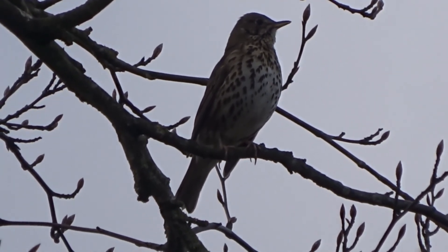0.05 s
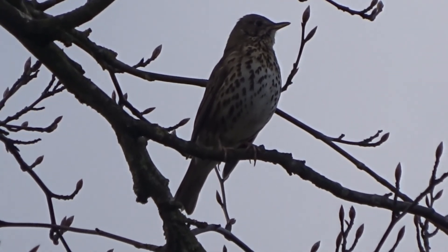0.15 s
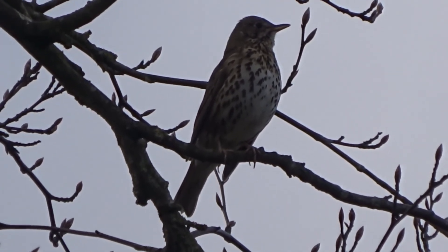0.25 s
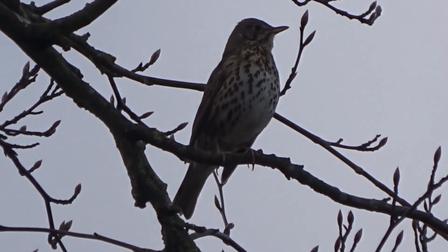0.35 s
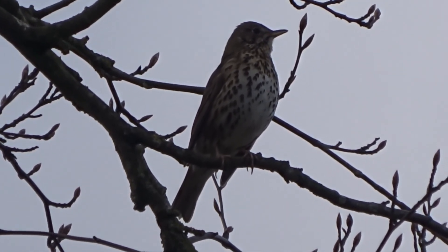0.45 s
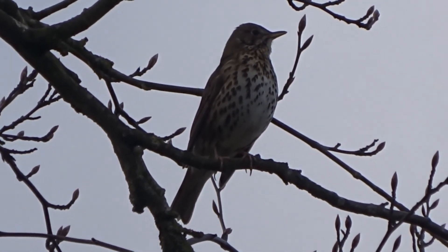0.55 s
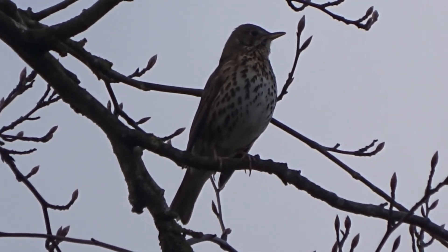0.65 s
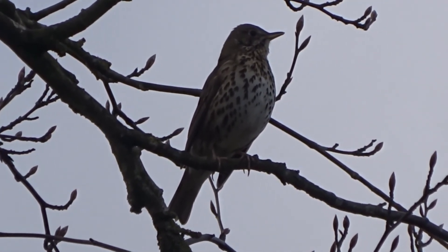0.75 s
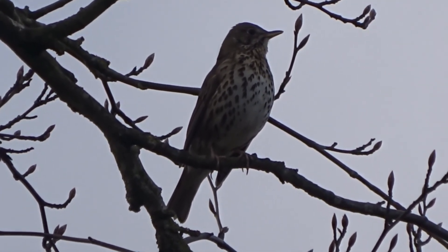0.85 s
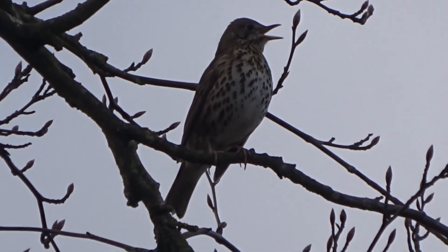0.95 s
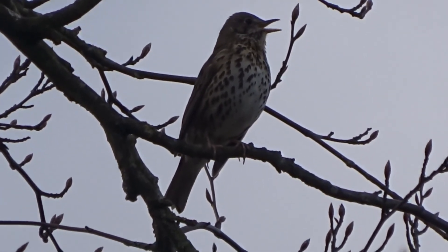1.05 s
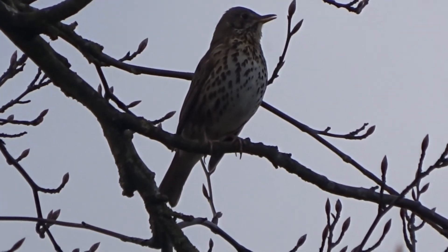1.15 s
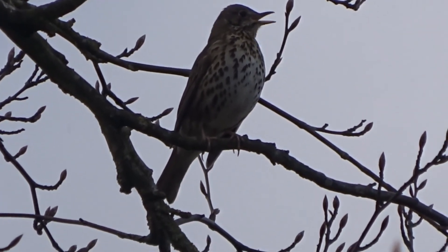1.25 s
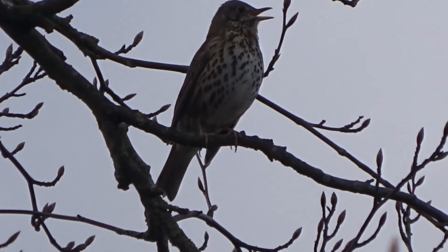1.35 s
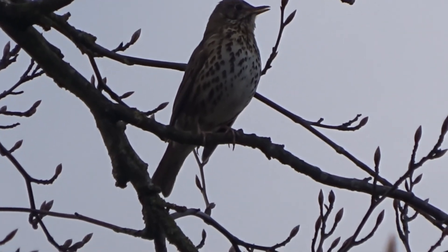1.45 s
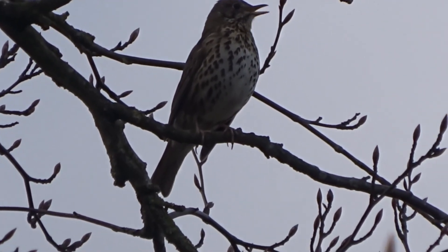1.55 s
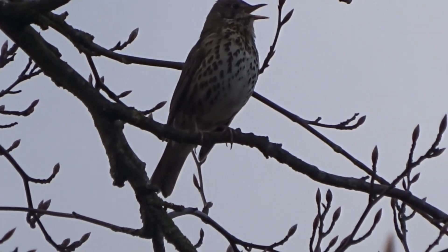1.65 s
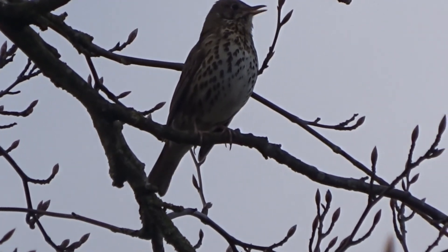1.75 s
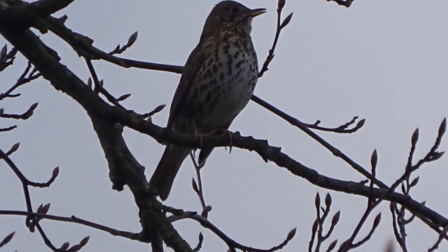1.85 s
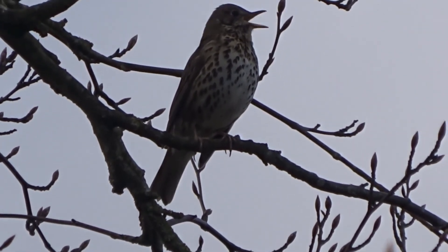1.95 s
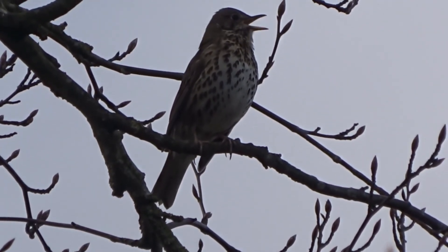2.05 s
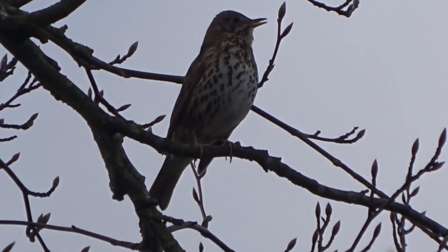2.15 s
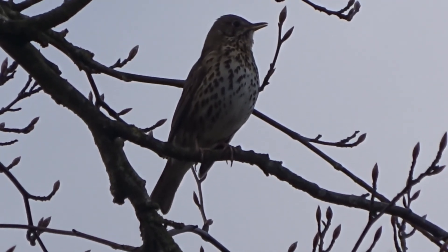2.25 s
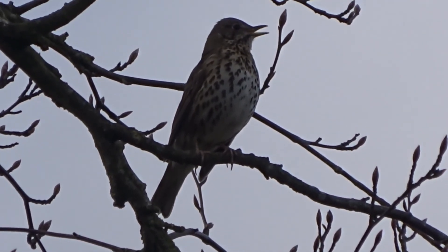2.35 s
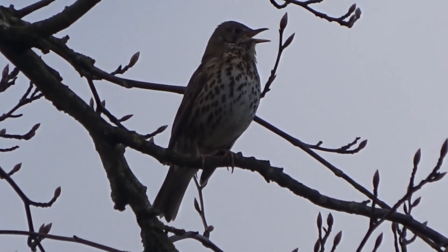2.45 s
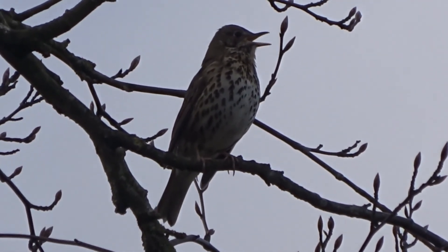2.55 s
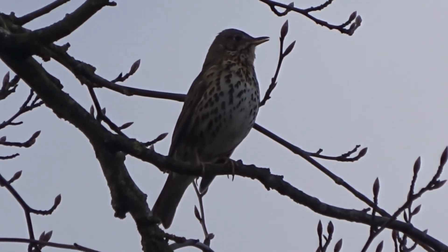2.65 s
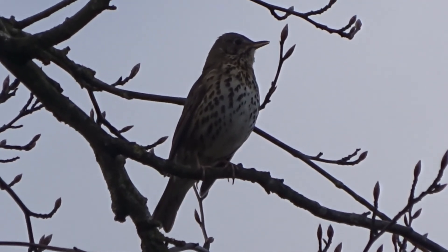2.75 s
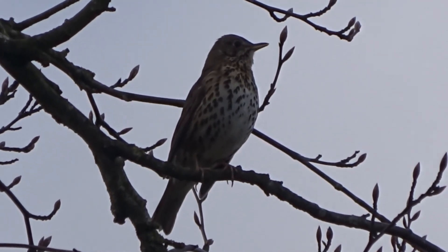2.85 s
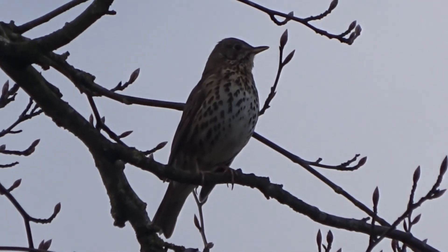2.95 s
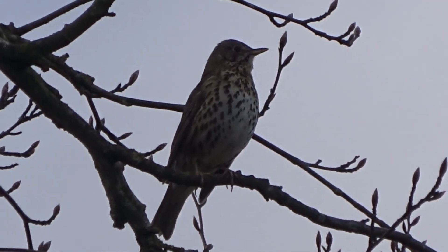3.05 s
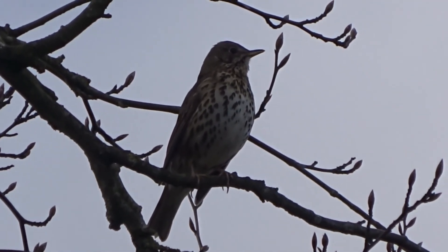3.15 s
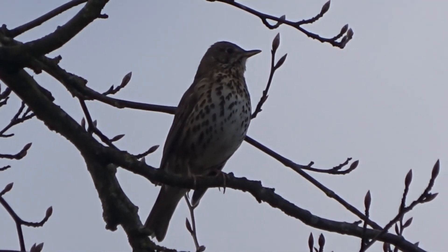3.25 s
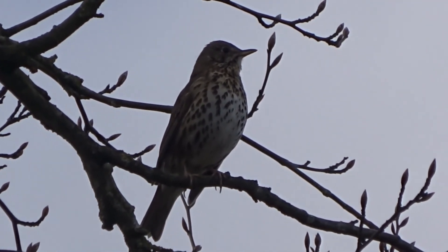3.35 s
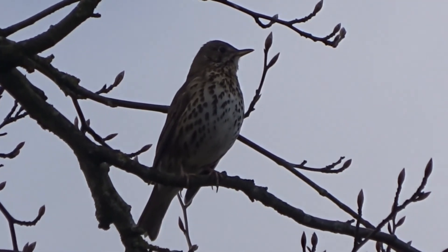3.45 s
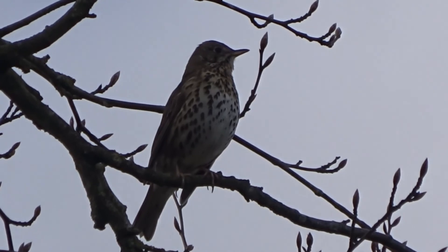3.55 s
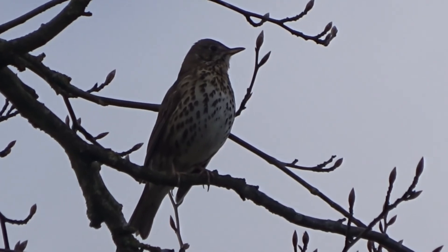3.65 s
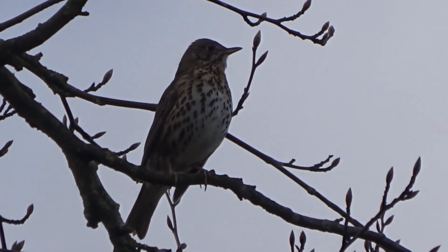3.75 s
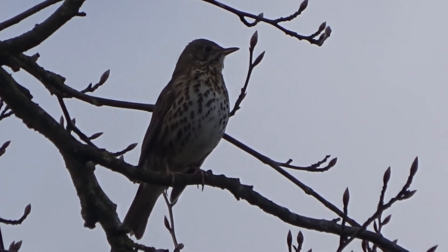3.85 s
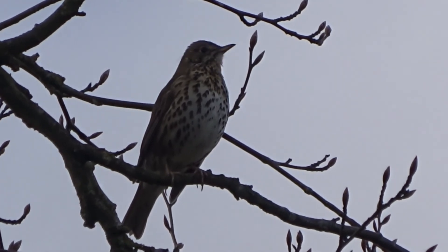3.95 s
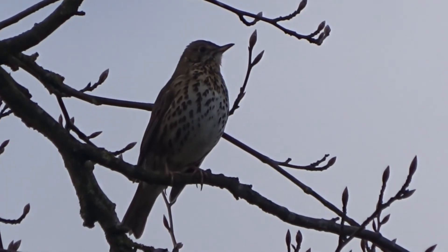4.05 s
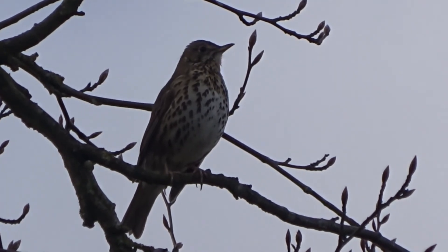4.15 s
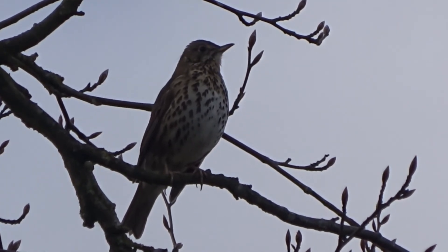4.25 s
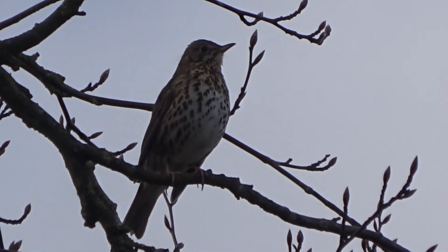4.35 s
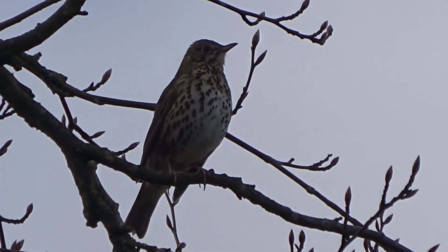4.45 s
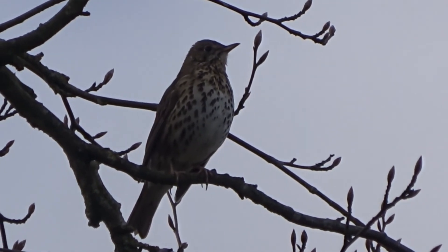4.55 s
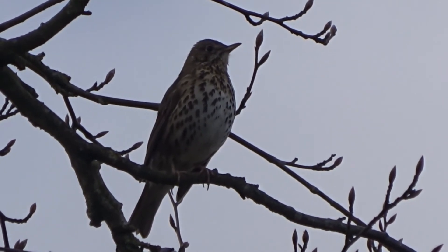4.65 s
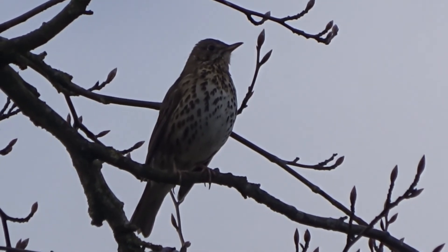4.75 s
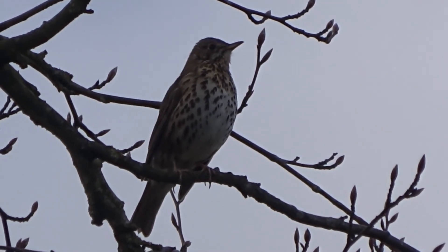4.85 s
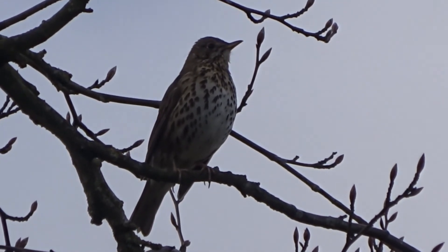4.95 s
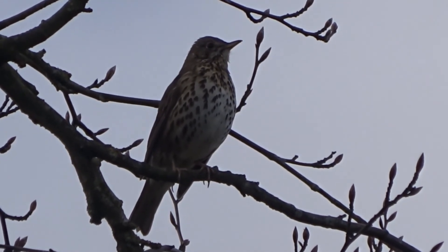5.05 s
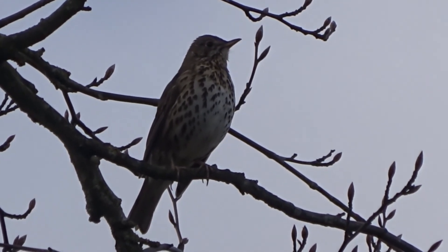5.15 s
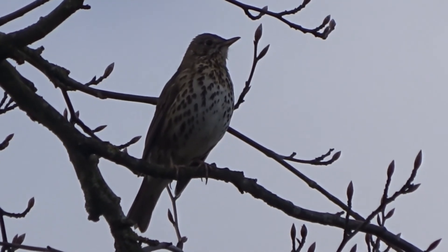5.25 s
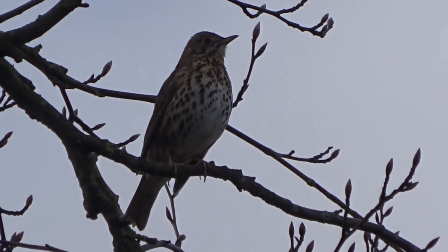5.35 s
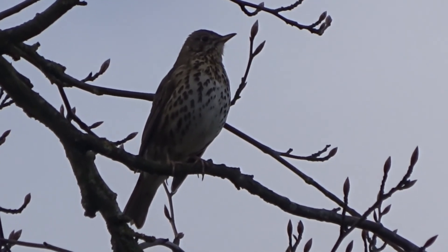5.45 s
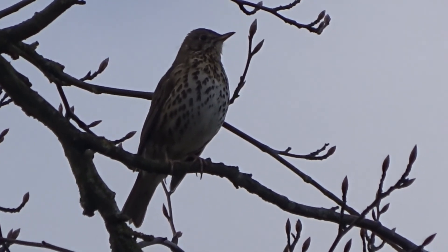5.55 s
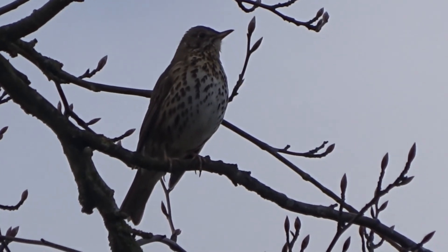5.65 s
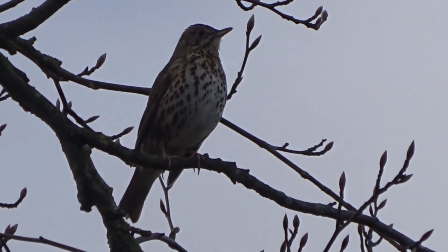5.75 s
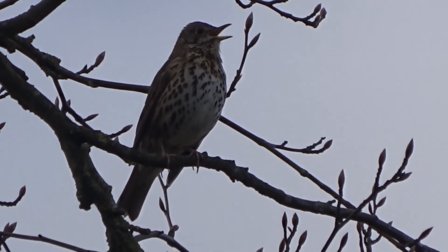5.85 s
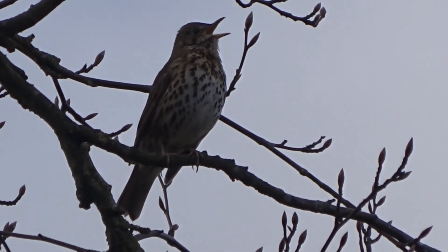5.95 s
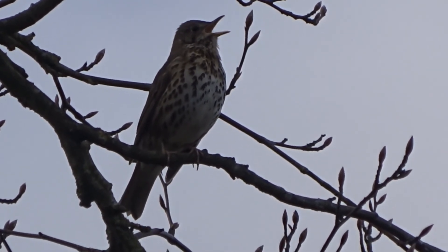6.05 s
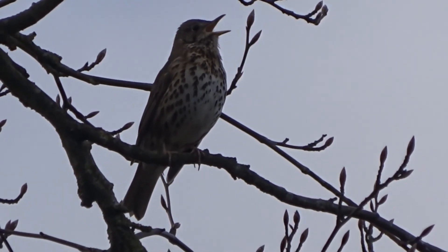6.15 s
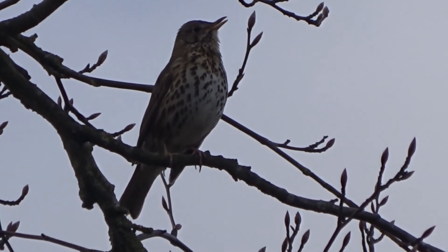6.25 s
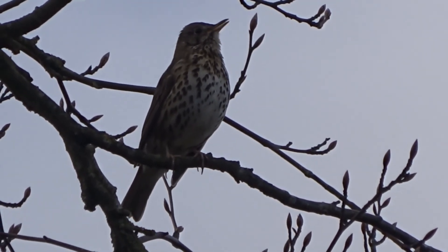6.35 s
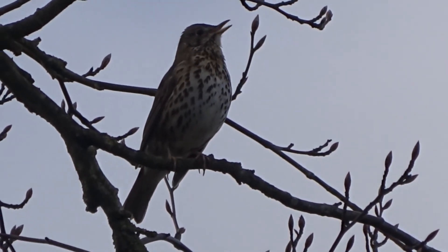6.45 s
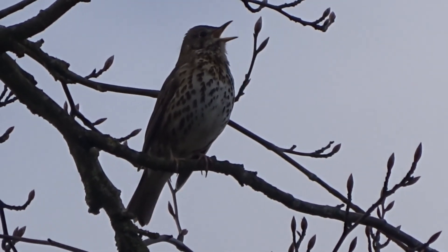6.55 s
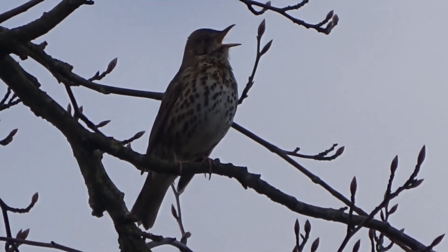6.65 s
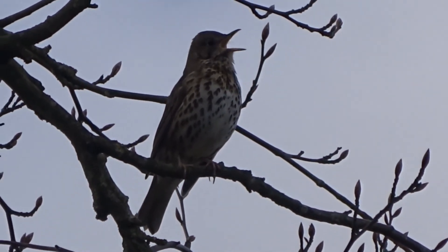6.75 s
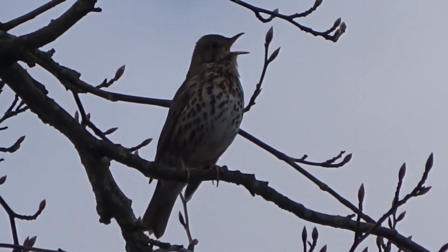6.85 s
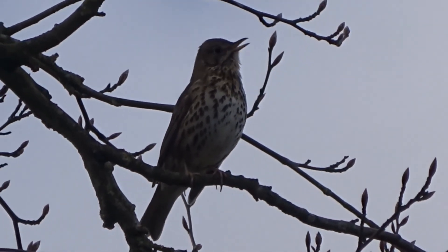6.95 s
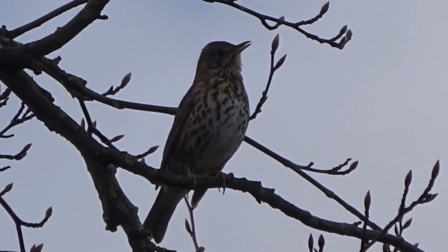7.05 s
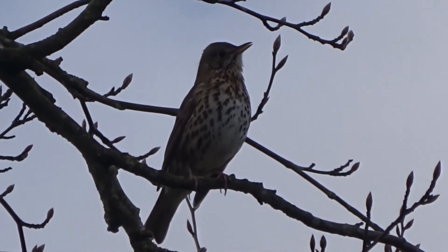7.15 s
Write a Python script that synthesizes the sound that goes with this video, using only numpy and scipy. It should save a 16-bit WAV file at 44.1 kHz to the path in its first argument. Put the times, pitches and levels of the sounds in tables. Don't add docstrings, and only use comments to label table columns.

```python
import sys
import numpy as np
from scipy import signal
from scipy.fft import rfft, irfft
from scipy.io import wavfile
from scipy.ndimage import uniform_filter1d, minimum_filter1d

SR = 44100
rng = np.random.default_rng(int(sys.argv[2]) if len(sys.argv) > 2 else 0)


def ratio_of_db(decibels):
    return 10 ** (np.asarray(decibels, float) / 20)


def int16_out(signal):
    q = np.round(np.clip(np.atleast_2d(signal).T, -1, 1) * 32767)
    wavfile.write(sys.argv[1], SR, q.astype(np.int16))


N = 317520

# t/s, level/dB
MOTIFS = [(2.045, -36), (2.273, -37.5), (2.53, -37), (5.67, -37.5), (5.905, -36.5), (6.15, -39.5)]
# t/s, length/s, pitch factor, level/dB
SLURS = [
    (1.068, .085, 1.001, 1),
    (1.392, .077, .999, -2),
]
# t/s, length/s, throb period/s, level/dB
DROPS = [
    (1.7031, 0.11, 0.05, 1.15),
    (2.0419, 0.15, 0.066, -0.3),
    (2.496, 0.1738, .053, -0.86),
]
GRACE_S = .03


def span(s, length):
    start = int(s * SR)
    at = np.arange(start, min(start + int(length * SR), N))
    return at, (at - start) / (length * SR)


def phase(hz):
    return 2 * np.pi * np.cumsum(hz) / SR


def walk(rate):
    k = int(SR / rate)
    steps = np.repeat(rng.standard_normal(N // k + 1), k)
    return 1.9 * uniform_filter1d(uniform_filter1d(steps, k), k)[:N]


def band(x, lo_hz, hi_hz):
    return signal.sosfilt(signal.butter(2, [lo_hz, hi_hz], "band", fs=SR, output="sos"), x)


def on_log(table, hz):
    table_hz, db = np.transpose(table)
    return np.interp(np.log(hz + 1), np.log(table_hz), db)


def pan(x, left_minus_right_db):
    half_db = np.asarray(left_minus_right_db) / 2
    return np.array([x * ratio_of_db(half_db), x * ratio_of_db(-half_db)])


def trees(x, db, t60, gap, sparse_db):
    t = np.arange(SR) / SR
    uneven = ratio_of_db(sparse_db * np.minimum(rng.standard_exponential(SR), 4))
    shape = ratio_of_db(-60 * t / t60) * np.clip(t / gap, 0, 1) * uneven
    mid, side = shape * rng.standard_normal((2, SR))
    response = np.array([mid + 0.36 * side, mid - 0.17 * side]) / np.sqrt(np.sum(mid ** 2))
    return ratio_of_db(db) * signal.fftconvolve(np.atleast_2d(x), response, axes=1)[:, :N]


def warble(rows, rate_hz, swing_hz, settle, throb, octave_db, reach, bend, ragged):
    out, stray = np.zeros(N), walk(200)
    for s, length, start_hz, end_hz, db in rows:
        at, u = span(s, length)
        shake = np.sin(phase(rate_hz * (1 + .3 * u + ragged * stray[at])))
        glide_hz = start_hz + (end_hz - start_hz) * np.minimum(u / reach, 1) ** bend
        stray_hz = 35 * stray[at] - 120 * u ** 3
        angle = phase(glide_hz + stray_hz + swing_hz * (1 - settle * u) * shake)
        edges = np.clip(np.minimum(7 * u, 6 * (1 - u)), 0, 1)
        swell = (0.068 + 1.71 * u) * edges * (1 + throb * u * shake)
        over = (1 + 0.49 * shake) ** 2 * (np.sin(2 * angle) + ratio_of_db(-17.0) * np.sin(3 * angle))
        out[at] += ratio_of_db(db) * swell * (np.sin(angle) + ratio_of_db(octave_db) * over)
    return out


def chirps(calls):
    out, flutter = np.zeros(N), ratio_of_db(1.7 * walk(120))
    for s, length, start_hz, end_hz, db in calls:
        mid_hz = start_hz + .63 * (end_hz - start_hz)
        at, u = span(s - .002, length + .004)
        v = (2 * u - 1) * (1 + .004 / length)
        hz = mid_hz + (end_hz - start_hz) / 2 * v + ((start_hz + end_hz) / 2 - mid_hz) * v ** 2
        out[at] += ratio_of_db(db + 6) * np.sin(np.pi * u ** 1.15) * np.sin(phase(hz))
    return out * flutter + ratio_of_db(-12) * np.roll(out, int(.009 * SR)) * flutter[::-1]


def hush():
    # f/Hz, level/dB per Hz
    colour = [(59, -90), (100, -68), (166, -47.5), (502, -25.5), (768, -7), (1030, 1), (1550, -2),
              (2470, -10.5), (3120, -8), (4290, -12), (4670, -16), (8640, -23.5), (12900, -23),
              (14700, -27.5), (16000, -23.5)]
    # f/Hz, side minus mid/dB
    width = [(300, -19.5), (1000, -12), (3000, -3.5), (6500, -4), (9000, -13.5), (15000, -11)]
    hz = np.fft.rfftfreq(N, 1 / SR)
    mid, side = (irfft(rfft(rng.standard_normal(N)) * ratio_of_db(on_log(colour, hz) + db), N)
                 for db in (0, on_log(width, hz)))
    level_db = -47 + .35 * walk(1.5)
    gain = ratio_of_db(level_db) / np.std(band(mid, 500, 2200))
    whine = ratio_of_db(-60.5) * np.sin(phase(np.full(N, 15625)))
    return gain * np.array([ratio_of_db(.5) * (mid + side), ratio_of_db(-1.0) * (mid - side)]) + pan(whine, 6)


def crack():
    out = np.zeros(N)
    at, u = span(2.502, 0.032)
    out[at] = ratio_of_db(-14) * np.exp(-u / 0.22) * rng.standard_normal(len(at))
    out = band(band(out, 910, 5540), 790, 6800)
    return pan(out, 6) + trees(out, db=0.0, t60=0.69, gap=0.0063, sparse_db=-0.5)


def rattles():
    # t/s, length/s, rate/clicks per s, level/dB, bird 0 or 1
    bursts = [
        (0, .022, 69.5, -49, 0),
        (0.025, 0.074, 69.5, -41, 0),
        (0.141, 0.097, 69.5, -40.5, 0),
        (0.285, 0.12, 69.5, -40.5, 0),
        (2.922, 0.064, 75, -42, 1),
        (3.071, 0.062, 75, -41.5, 1),
        (3.203, 0.069, 71, -42, 1),
    ]
    # f/Hz, width/Hz, level/dB
    throats = [
        [(4300, 1300, -8), (5400, 370, -4.5), (6330, 470, -7.5)],
        [(4600, 690, -10.5), (6000, 760, -9), (6810, 380, -11)],
    ]
    rise_share = (.2, .1)
    ticks, ring, wander = np.zeros((2, N)), np.zeros(N), walk(140)
    for s, length, rate, db, bird in bursts:
        bird = round(bird)
        at, u = span(s, length)
        late = (u * length * rate % 1) / rise_share[bird]
        puff = ratio_of_db(db) * (0.27 + u ** 0.58) * late * np.exp(1 - late)
        ticks[bird, at] += puff * rng.standard_normal(len(at))
        if bird == 0:
            ring[at] += puff * np.sin(phase(5400 - 150 * (late - 1) + 110 * wander[at]))
    throat = sum(ratio_of_db(db) * band(x, hz - width / 2, hz + width / 2)
                 for x, modes in zip(ticks, throats) for hz, width, db in modes)
    return ratio_of_db(7) * ring + ratio_of_db(21.0) * throat


def trills():
    # length/s, start f/Hz, end f/Hz, level/dB
    trill = (0.0734, 7548, 5747.5, -1.4)
    length, start_hz, end_hz, trill_db = trill
    rows = [(s, length, start_hz, end_hz, db + trill_db) for s, db in MOTIFS]
    return warble(rows, rate_hz=175, swing_hz=520, settle=.8, throb=.4,
                  octave_db=-50, reach=1, bend=1.0, ragged=.1)


def place(starts, shape):
    return [(s + late, length, a_hz, b_hz, db + part_db)
            for s, db in starts for late, length, a_hz, b_hz, part_db in shape]


def zigzag():
    # t/s, level/dB
    turns = [(4.495, -50), (4.55, -40.5), (4.603, -38.5), (4.665, -39), (4.732, -38.5), (4.845, -49),
             (4.878, -53)]
    # t after its start/s, length/s, start f/Hz, end f/Hz, level/dB
    turn = [
        (.002, 0.0148, 4256, 3280, 1.5),
        (.024, 0.018, 3120, 3700, -4.5),
        (.038, 0.0177, 3700, 4300, -5),
    ]
    return chirps(place(turns, turn))


def twitter():
    calls = []
    for s, pitch, up in rng.random(size=(120, 3)):
        hz = 3000 + pitch * 1500
        calls.append((s * N / SR, .016, hz, hz + 700 * (2 * up - 1), -58))
    return calls


def far_calls():
    # t/s, length/s, start f/Hz, level/dB
    sweeps = [(.169, .019, 3040, -37.5), (.273, .018, 3050, -39), (.527, 0.045, 3400, -53.5),
              (1.124, 0.015, 3480, -40), (1.709, 0.017, 4150, -48), (1.976, .008, 4240, -46),
              (2.063, .018, 4200, -43), (2.219, 0.019, 3304, -41), (2.687, .014, 4007, -44.5),
              (3.045, 0.0187, 3090, -41), (3.419, 0.023, 3430, -43.5), (3.766, 0.0083, 3150, -39.5),
              (3.874, .006, 3520, -39), (3.99, .009, 3420, -42), (4.535, 0.015, 3310, -39.5),
              (4.7, .017, 3220, -38.5), (4.987, .01, 3490, -46), (5.326, 0.016, 3800, -38.5),
              (5.615, 0.014, 3210, -36), (5.774, .01, 4120, -35), (6.543, .016, 3520, -40),
              (6.799, 0.013, 3640, -42.5), (7.152, 0.027, 3520, -40.5)]
    lifts = [(.614, 0.016, 3990, -53), (.731, 0.019, 3750, -46), (.884, 0.013, 3730, -57),
             (3.343, .018, 3820, -42), (3.247, 0.015, 3230, -40.5), (3.697, 0.013, 3620, -45),
             (3.827, .012, 3870, -43), (3.939, 0.013, 3900, -43), (6.946, 0.0072, 4100, -44)]
    rises = [(.667, .017, 3400, -47.5), (.809, 0.011, 3570, -43), (1.22, 0.0074, 3640, -39),
             (1.611, 0.031, 3100, -40), (2.704, 0.012, 3810, -41.5), (3.461, 0.023, 3450, -44),
             (3.72, 0.0087, 3620, -42), (4.785, 0.03, 3380, -40.5), (4.76, .012, 3770, -41),
             (4.83, .015, 3700, -41.5), (5.105, 0.017, 2940, -47), (5.235, 0.027, 2920, -38.5)]
    pips = [
        (4.16, 0.01, 3450, -45.5),
        (5.069, 0.0073, 3152, -36),
        (7.1, .024, 3000, -43),
    ]
    # t/s, length/s, start f/Hz, level/dB
    falls = [(0.716, 0.0095, 3400, -46.5), (0.761, 0.013, 3500, -51), (1.637, 0.014, 3210, -40.5),
             (2.74, 0.01, 3490, -38), (2.808, 0.019, 3500, -34), (2.88, 0.017, 3160, -40.5),
             (2.965, 0.016, 5900, -46), (3.376, 0.012, 5100, -48), (3.485, 0.01, 3300, -48),
             (3.558, 0.011, 3190, -40.5), (3.622, .01, 3130, -41), (4.207, 0.015, 3410, -56),
             (4.288, 0.013, 3080, -49), (4.356, 0.016, 3130, -43), (4.446, 0.014, 3010, -45.5),
             (4.172, 0.011, 3500, -47.5), (5.258, 0.017, 3520, -46), (5.338, 0.012, 3110, -54),
             (5.414, 0.015, 3080, -45.5), (5.574, 0.016, 3670, -50), (5.716, 0.0081, 3800, -39.5)]
    # t later/s, length/s, start f/Hz, end f/Hz, level/dB
    motif_tail = [
        (0.052, 0.075, 5604, 5480, -9.5),
        (.064, 0.018, 4240, 4470, 0),
        (0.082, .018, 4400, 3800, -1.5),
        (0.103, .036, 3650, 2915, 4),
    ]
    # t/s, level/dB
    phrases = [
        (1.823, -29),
        (5.443, -33),
    ]
    # t from its held note/s, length/s, start f/Hz, end f/Hz, level/dB
    phrase_lead = [
        (-.332, .074, 3520, 5310, -10.5),
        (-.03, 0.048, 5130, 4500, -15.5),
        (0, .12, 4600, 4488, -2.8),
    ]
    # t/s, length/s, start f/Hz, end f/Hz, level/dB
    high_calls = [(0.668, .09, 5110, 5190, -52.5), (1.027, 0.017, 6130, 6100, -47.5),
                  (1.148, .012, 3660, 4470, -44), (1.16, 0.028, 4100, 5400, -37.5),
                  (1.276, 0.012, 7200, 7950, -52), (1.278, 0.033, 6200, 6610, -43),
                  (2.812, 0.019, 3830, 5400, -45), (2.824, .022, 5260, 5350, -54),
                  (2.868, 0.0093, 4600, 4930, -49), (2.85, .3, 7700, 8090, -75),
                  (3.167, 0.13, 4924, 4800, -43.5), (3.55, 0.017, 4520, 5060, -47),
                  (4.382, 0.03, 5800, 4250, -46), (4.626, 0.012, 6170, 6220, -49),
                  (4.645, 0.059, 6330, 6240, -59.5), (4.629, .012, 4700, 5400, -53),
                  (4.772, .02, 3900, 5350, -42.5), (4.8, 0.023, 5200, 5250, -56),
                  (4.817, 0.013, 3590, 3100, -41), (4.886, .011, 5250, 6000, -56),
                  (4.892, 0.024, 6470, 6580, -50.5), (4.919, 0.065, 6600, 6620, -58),
                  (4.993, 0.041, 4900, 5780, -47), (4.997, 0.043, 4370, 5160, -39),
                  (5.354, .006, 5200, 6960, -47), (5.367, 0.05, 5620, 5780, -40),
                  (5.92, .018, 3200, 3800, -34), (5.923, 0.024, 6840, 8500, -55.5),
                  (6.03, 0.099, 4850, 4770, -47), (6.602, 0.0098, 5020, 5530, -49.5),
                  (6.675, 0.015, 3710, 4950, -48), (6.985, 0.027, 3800, 5350, -42),
                  (7.008, .024, 3900, 5700, -47), (7.183, 0.019, 3900, 5450, -41.5)]
    low_calls = [(2.86, 0.1, 2450, 2290, -52), (2.97, .07, 2100, 2446, -51), (2.8, 0.13, 2680, 2520, -53.5),
                 (2.955, 0.023, 3000, 3970, -50), (3.02, .025, 3700, 3480, -53),
                 (3.52, 0.029, 3800, 4500, -55), (.75, .03, 3450, 3260, -53),
                 (.966, 0.029, 2970, 3400, -46.5), (0.892, .012, 2650, 2900, -62),
                 (3.37, 0.11, 1252, 1084, -51), (4.9, 0.024, 4450, 3100, -50),
                 (3.9, 0.044, 3960, 2600, -47), (4.24, 0.049, 2650, 3820, -45.5),
                 (4.28, 0.044, 3750, 4330, -44.5), (5.105, .03, 3490, 4330, -50),
                 (6.59, .03, 2685, 4050, -31), (5.332, 0.0093, 3262, 2900, -43),
                 (5.78, 0.077, 2570, 2400, -54), (5.82, 0.1, 2882, 2770, -48),
                 (6.13, 0.26, 2600, 2222, -49.5), (7.115, 0.048, 3046, 2700, -47.5)]
    faint_calls = [(.573, 0.009, 4470, 5000, -51), (0.6, 0.014, 3860, 4580, -50),
                   (2.44, 0.039, 5050, 4750, -60), (2.625, 0.023, 5300, 4750, -54),
                   (2.655, .035, 4760, 4500, -55), (3.043, 0.009, 4300, 4900, -55),
                   (3.35, .01, 5050, 5400, -48), (3.535, .035, 4360, 4450, -55),
                   (3.302, 0.037, 4680, 5040, -50), (.635, .04, 5400, 5150, -58),
                   (0.713, .01, 4200, 4900, -52), (.955, .022, 3500, 4350, -54.5),
                   (3.297, 0.048, 4420, 3880, -57), (3.494, 0.036, 5230, 4400, -52),
                   (3.6, .03, 5550, 4760, -56.5), (3.63, .045, 4780, 4850, -55),
                   (4.046, .015, 6500, 6530, -56.5), (4.047, .012, 7650, 7700, -62),
                   (4.381, .012, 3500, 5000, -59), (5.467, .025, 4800, 5400, -54),
                   (5.484, .04, 3700, 4300, -56), (5.525, .012, 3600, 4700, -51),
                   (5.655, .022, 6000, 5700, -58), (5.704, .012, 4800, 5400, -47),
                   (7.094, .035, 6300, 5314, -60), (7.103, .015, 3100, 3850, -47),
                   (7.12, .025, 3750, 3570, -53), (6.69, .035, 4800, 4900, -54.5),
                   (6.598, .025, 5900, 6700, -49.5), (3.651, .013, 5700, 5820, -55),
                   (4.143, .012, 3190, 2720, -62), (4.145, 0.011, 4030, 4550, -55),
                   (4.253, .025, 6000, 5400, -62), (4.45, .014, 4020, 5000, -48),
                   (4.469, 0.02, 4550, 4370, -45.5)]
    climbs = [(s, length, hz, top_hz, db)
              for rows, top_hz in ((sweeps, 5050), (lifts, 4580), (rises, 4190), (pips, 3586))
              for s, length, hz, db in rows]
    sag_hz_per_s = 37000
    sags = [(s, length, hz, hz - sag_hz_per_s * length, db) for s, length, hz, db in falls]
    songbird = place(MOTIFS, motif_tail) + place(phrases, phrase_lead)
    return [*twitter(), *climbs, *sags, *songbird, *high_calls, *low_calls, *faint_calls]


def chorus():
    # t/s, left minus right/dB
    places = [(0.0, -5), (2.87, 3), (4.25, 9), (4.47, -3.5), (7.2, 0.5)]
    pan_db = np.interp(np.arange(N) / SR, *np.transpose(places))
    calls = pan(chirps(far_calls()), pan_db)
    rough = trills() + rattles() + zigzag()
    calls_echo = trees(calls, db=-8.0, t60=0.55, gap=0.0032, sparse_db=-2.0)
    rough_echo = trees(rough, db=-3.0, t60=0.38, gap=0.011, sparse_db=2.0)
    return calls + calls_echo + rough + rough_echo


def song():
    # share of the note 0-1, pitch f/Hz, level/dB
    slur = [(0, 3150, -40.5), (.2, 3556, -32.5), (.48, 3370, -17.5), (.56, 3250, -15.5), (.88, 2980, -14),
            (1, 2884, -24)]
    grace = [(0, 3720, -44), (.4, 3657, -19), (.85, 3630, -7.5), (1, 3630, -15.5)]
    drop = [(0, 3250, -10), (.09, 3069, -9.5), (.4, 2952, -12), (.68, 2919, -12), (.9, 2950, -16.5),
            (1, 2934, -27.5)]
    # t/s, pitch f/Hz, level/dB
    arches = [
        [(5.924, 2219, -39.5), (5.954, 2870, -11.5), (5.972, 3186, -14.5), (6.022, 3301, -10.5),
         (6.06, 3196, -9), (6.112, 3087, -16.5), (6.16, 2966, -14.5), (6.244, 2883, -13.5), (6.275, 2939, -22)],
        [(6.603, 2264, -37), (6.616, 2662, -16), (6.638, 3020, -12.5), (6.678, 3300, -9.5), (6.73, 3183, -6.5),
         (6.83, 3068, -16.5), (6.92, 2932, -12.5), (6.968, 3103, -19.5), (6.995, 2960, -26.5)],
    ]

    def sing(shape, s, length, factor, db):
        return [(s + u * length, hz * factor, at_db + db) for u, hz, at_db in shape]

    slurs = [sing(slur, *row) for row in SLURS]
    graces = [sing(grace, s - GRACE_S, GRACE_S, 1, db) for s, _, _, db in DROPS]
    drops = [sing(drop, s, length, 1, db) for s, length, _, db in DROPS]
    return [*slurs, *graces, *drops, *arches]


def thrush():
    # f/Hz, level/dB
    beak = [(5000, -28.5), (5900, -39.5), (6500, -30), (7000, -24.5), (7300, -39), (9000, -58),
            (9800, -48.5), (11000, -50), (11800, -36.5), (13000, -46.5), (13800, -61.5)]
    # t/s, length/s, start f/Hz, end f/Hz, level/dB
    buzzes = [
        (1.038, 0.064, 4110, 5260, -20),
        (1.355, 0.065, 4150, 5213, -16),
    ]
    # extra dB on the second, third and fourth partials
    grace_open_db, slur_open_db, drop_open_db = (7, 20, -2), (15, 4.5, -1), (-6.5, 8, 1)
    throb_db, throb_s, throb_hz = 8, .008, 69.9
    t = np.arange(N) / SR
    hz, size, open_db = np.full(N, 3000.), np.zeros(N), np.zeros((3, N))
    for s, length, _, _ in SLURS:
        at, u = span(s, length)
        open_db[:, at] = np.outer(slur_open_db, np.clip(1.7 - 2.64 * u, -.6, 1))
    for note in song():
        s, pitch_hz, db = np.transpose(note)
        at = np.arange(int(s[0] * SR), int(s[-1] * SR) + 1)
        hz[at] = np.interp(at / SR, s, pitch_hz)
        size[at] = ratio_of_db(np.interp(at / SR, s, db))
    for s, length, period, _ in DROPS:
        at, u = span(s, length)
        from_dip_s = ((u * length / period + .5) % 1 - .5) * period
        dip = np.exp(-(from_dip_s / throb_s) ** 2) * (u * length > period / 2)
        hz[at] -= throb_hz * dip
        size[at] *= ratio_of_db(-throb_db * dip)
        open_db[:, span(s - GRACE_S, GRACE_S)[0]] = np.c_[list(grace_open_db)]
        open_db[:, at] = np.outer(drop_open_db, (1 - u) ** 2)
        size *= 1 - .85 * np.exp(-((t - s + .0022) / .0018) ** 2)
        hz += 518.5 * np.exp(-((t - s + .0008) / .0016) ** 2)
    hz = uniform_filter1d(hz, size=60) * (1 + 0.0016 * walk(90))
    size = np.sqrt(2) * uniform_filter1d(size, size=70)
    angle = phase(hz)
    tone = size * np.sin(angle)
    upper = np.zeros(N)
    for k in range(2, 5):
        gape_db = uniform_filter1d(open_db[k - 2], size=100)
        upper += size * ratio_of_db(on_log(beak, k * hz) + gape_db + 3.96 * walk(40)) * np.sin(k * angle)
    air = ratio_of_db(-34.0) * size * band(rng.standard_normal(N), 2300, 4800)
    buzz = warble(buzzes, rate_hz=140, swing_hz=390, settle=0.87, throb=0.11,
                  octave_db=-17.5, reach=0.28, bend=.6, ragged=0.16)
    sums = ratio_of_db(5.0) * band(tone * buzz, 6200, 8300) + ratio_of_db(24.5) * band(upper * buzz, 10870, 12800)
    return tone + upper + air + buzz + sums


def scene():
    bird = thrush()
    direct = pan(ratio_of_db(1.0) * bird, .9)
    flutter = trees(band(bird, 900, 12500), db=-6.5, t60=0.26, gap=0.0019, sparse_db=13.0)
    woods = trees(band(bird, 1500, 7500), db=-25, t60=1.3, gap=0.092, sparse_db=1.5)
    return direct + flutter + woods + chorus() + crack() + hush()


def band_limit(x):
    return signal.sosfilt(signal.butter(12, 16980, fs=SR, output="sos"), x)


def record(dry):
    thin = signal.sosfilt(signal.butter(4, 450, "high", fs=SR, output="sos"), dry)
    thin = signal.sosfilt(signal.ellip(8, .2, 60, 15850, fs=SR, output="sos"), thin)
    peak = abs(thin).max(axis=0) + 1e-9
    room = minimum_filter1d(np.minimum(1, .9 / peak), size=400)
    mix = thin * uniform_filter1d(room, size=200)
    return band_limit(mix)


dry = scene()
out = record(dry)
int16_out(out)
```